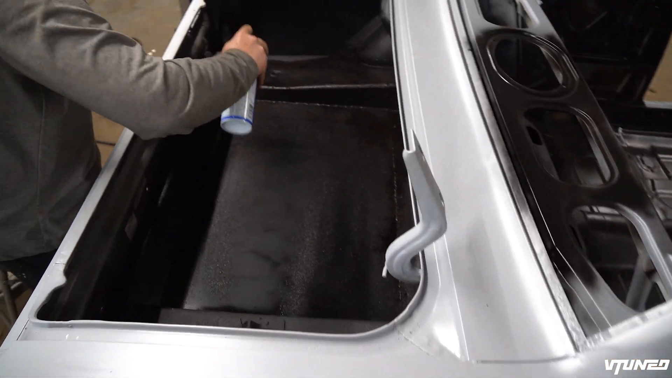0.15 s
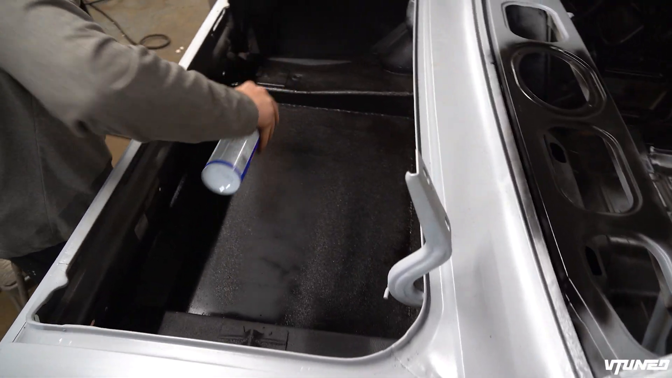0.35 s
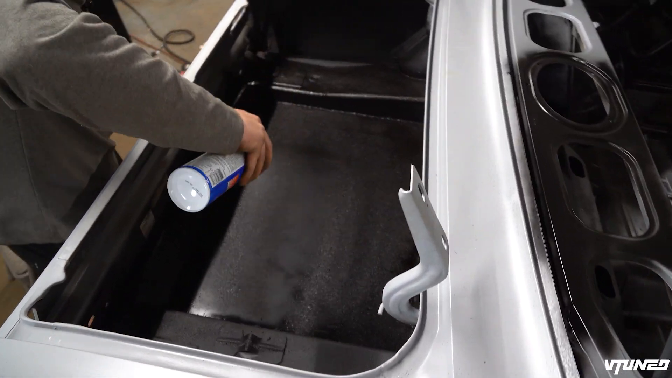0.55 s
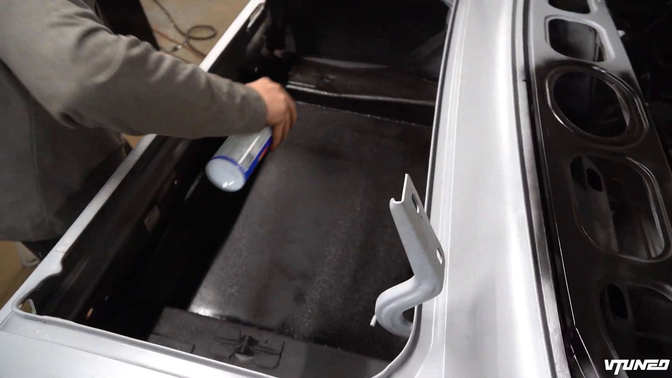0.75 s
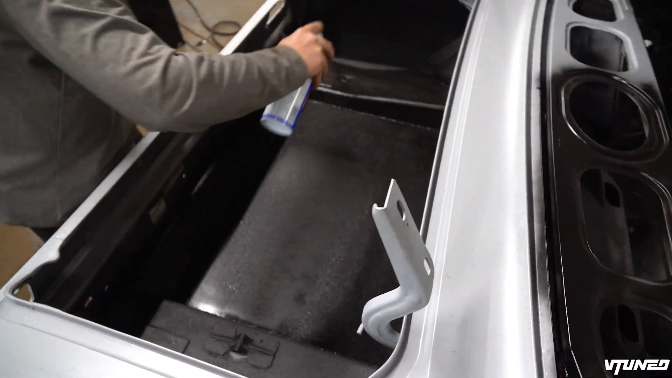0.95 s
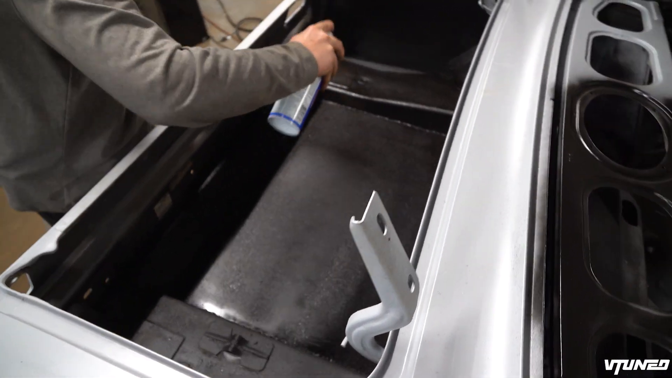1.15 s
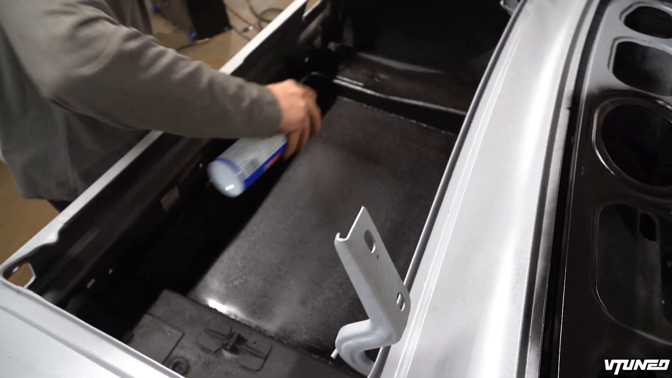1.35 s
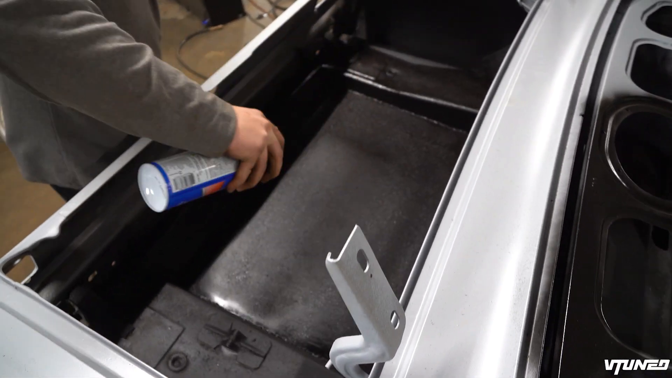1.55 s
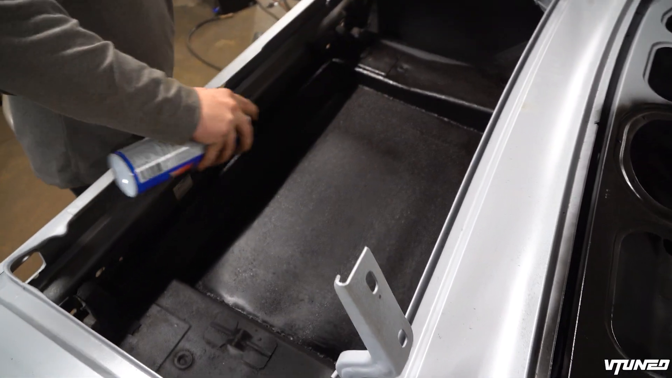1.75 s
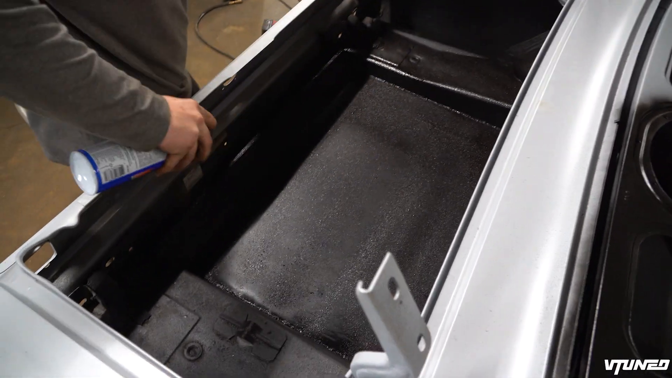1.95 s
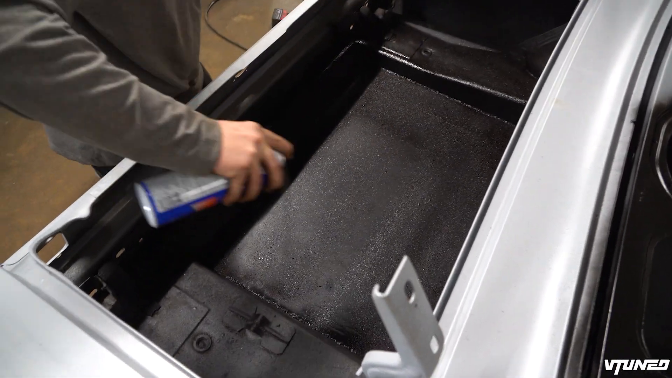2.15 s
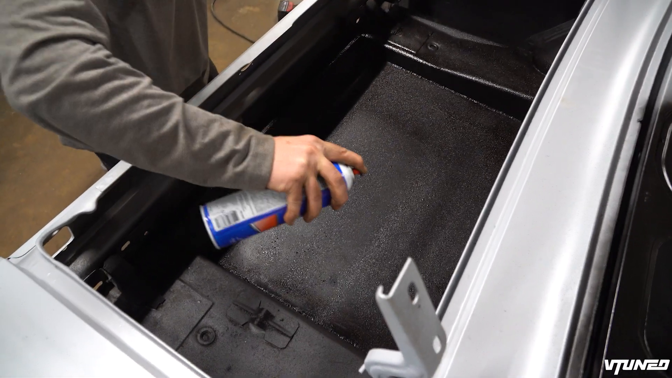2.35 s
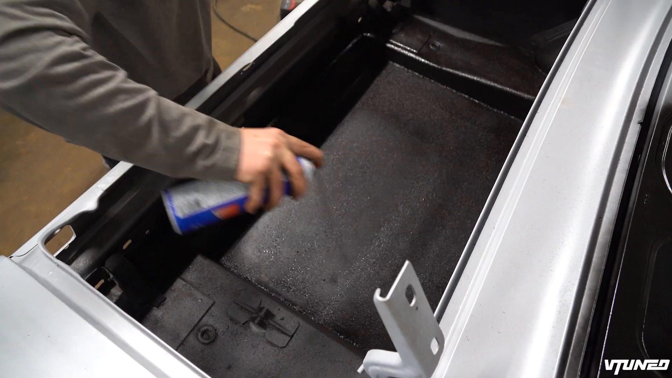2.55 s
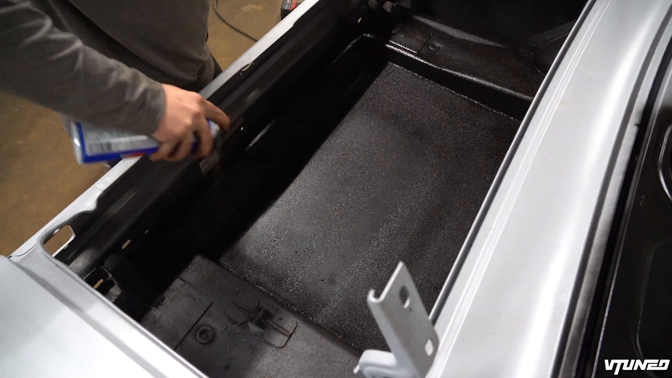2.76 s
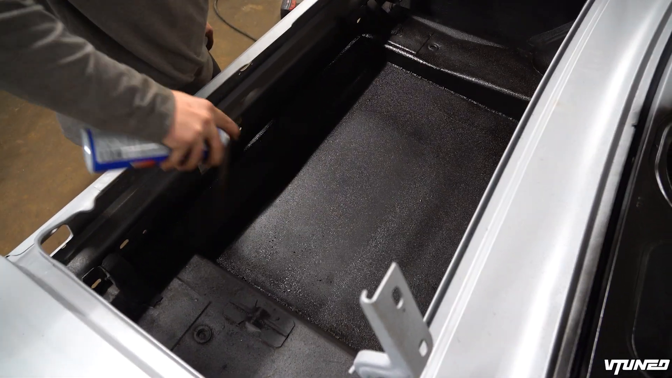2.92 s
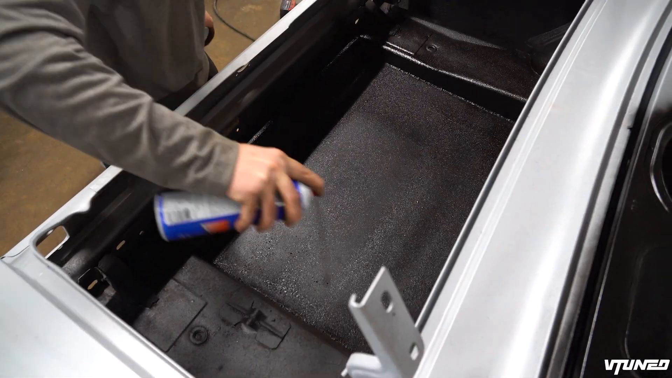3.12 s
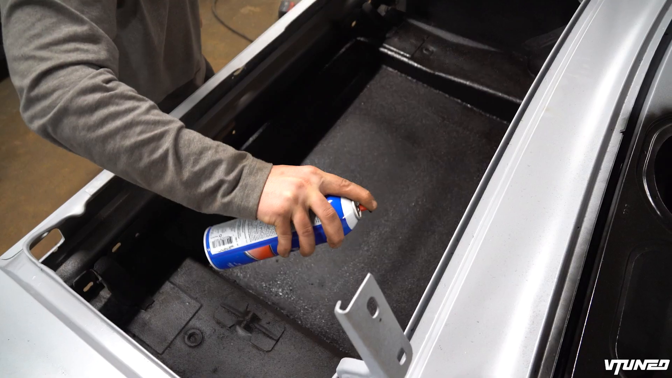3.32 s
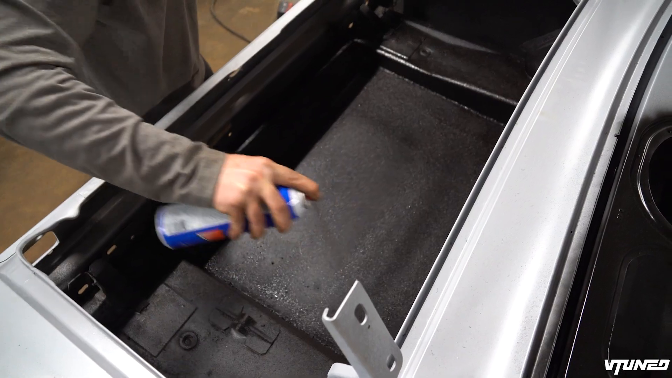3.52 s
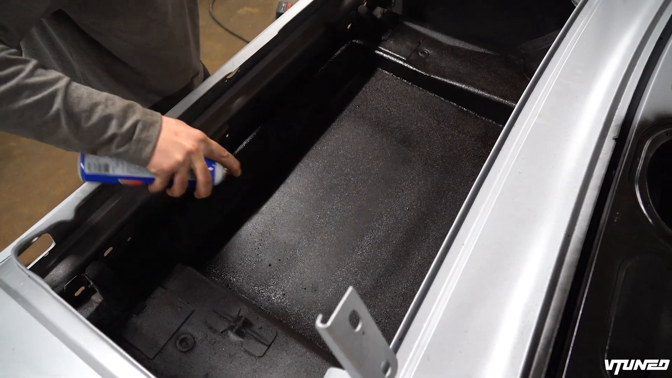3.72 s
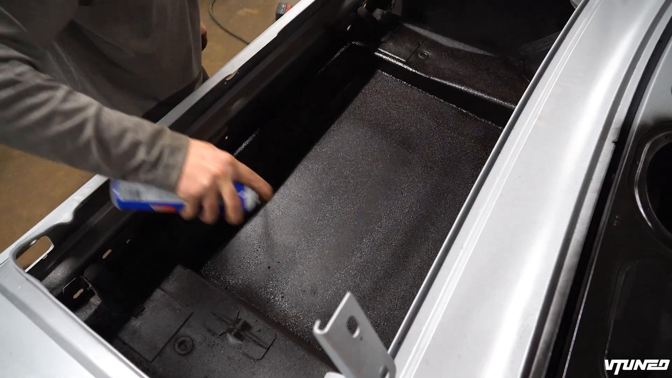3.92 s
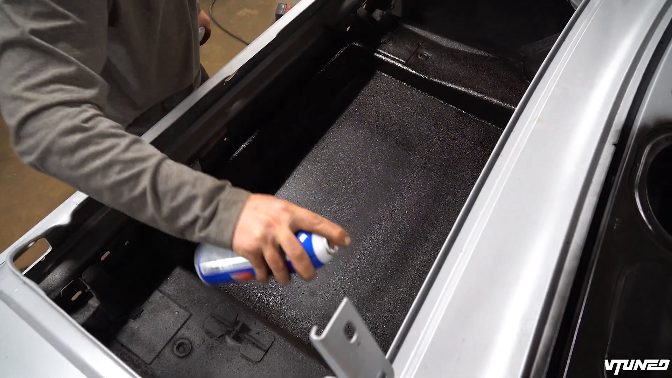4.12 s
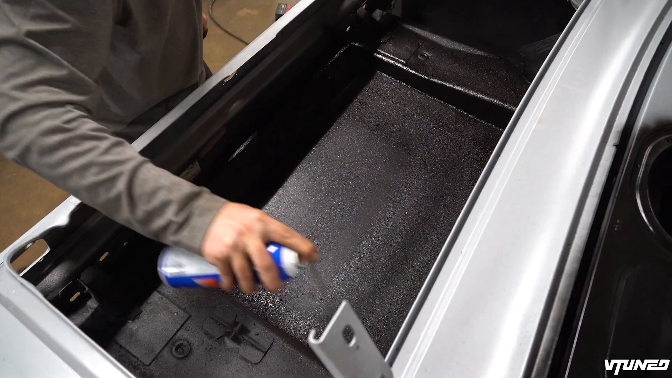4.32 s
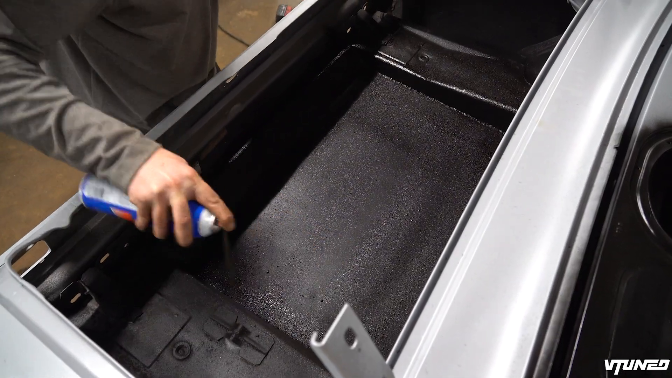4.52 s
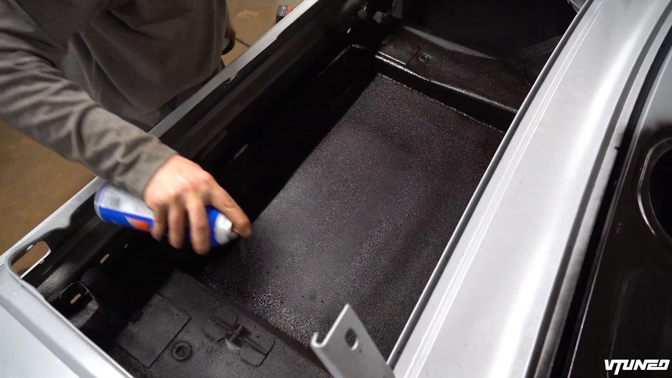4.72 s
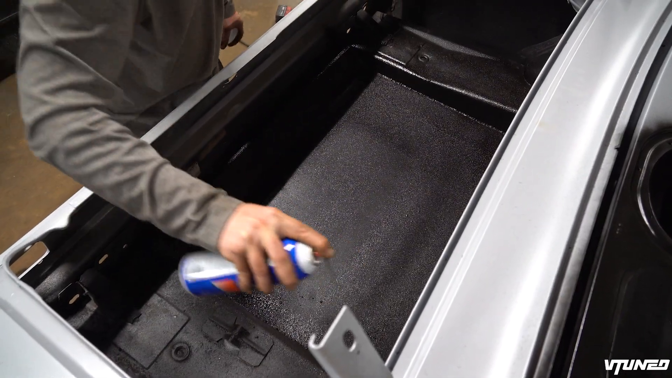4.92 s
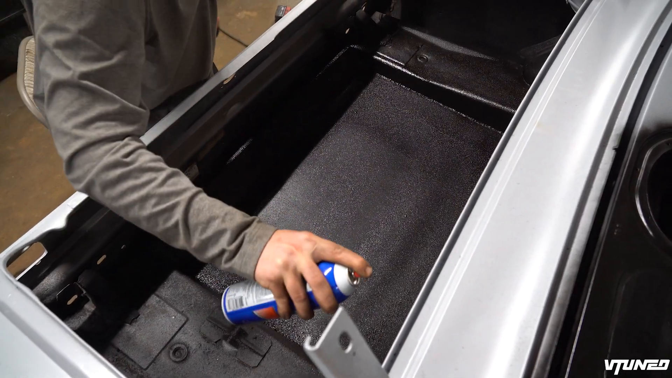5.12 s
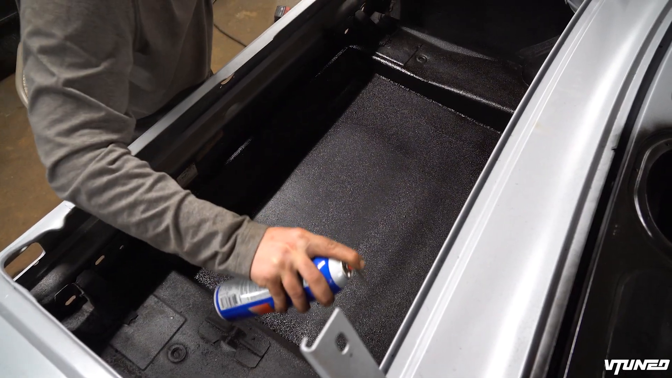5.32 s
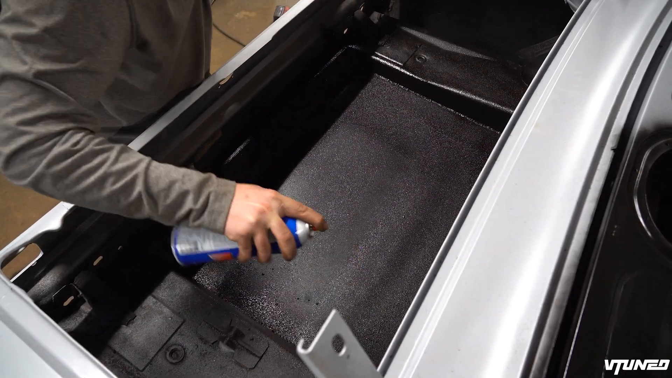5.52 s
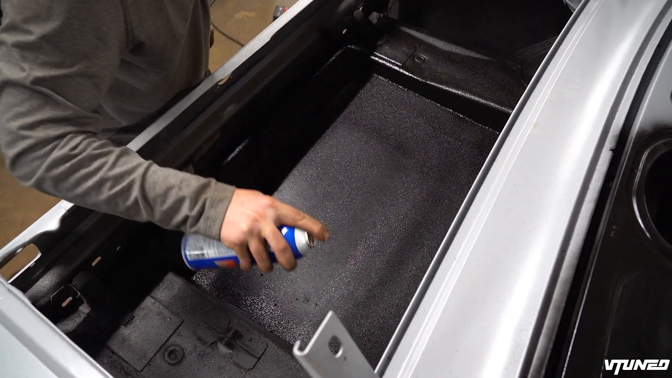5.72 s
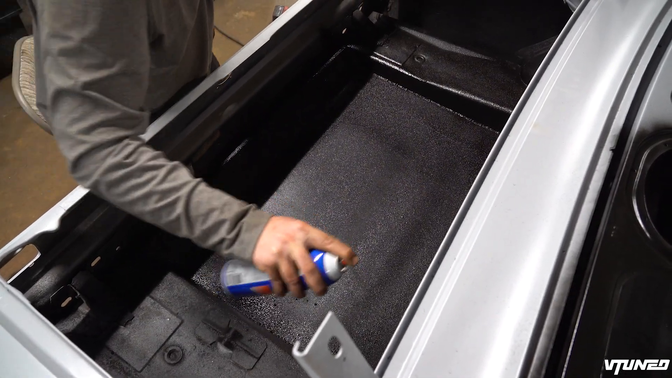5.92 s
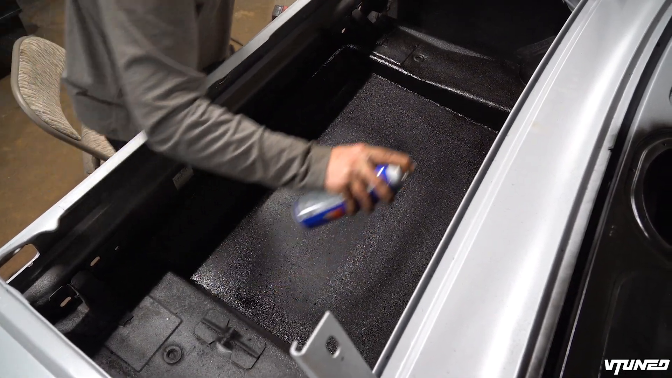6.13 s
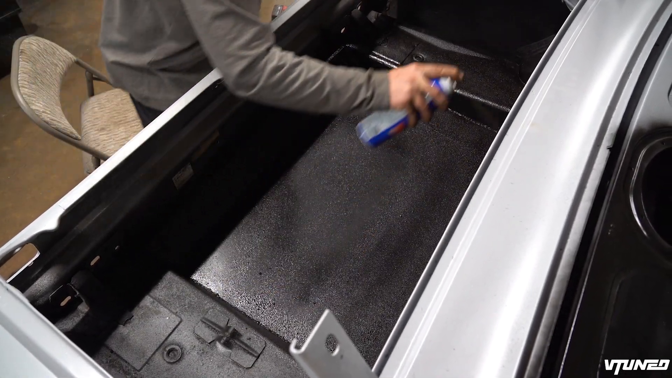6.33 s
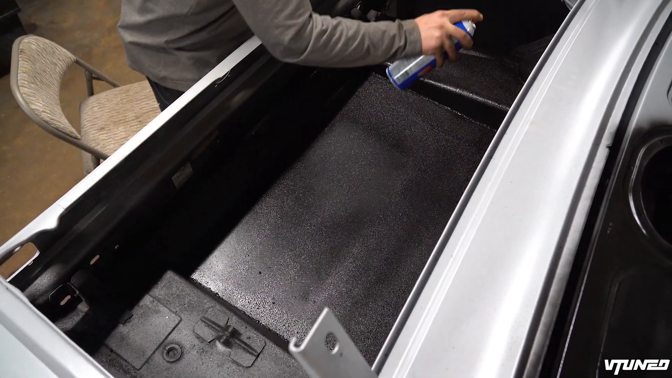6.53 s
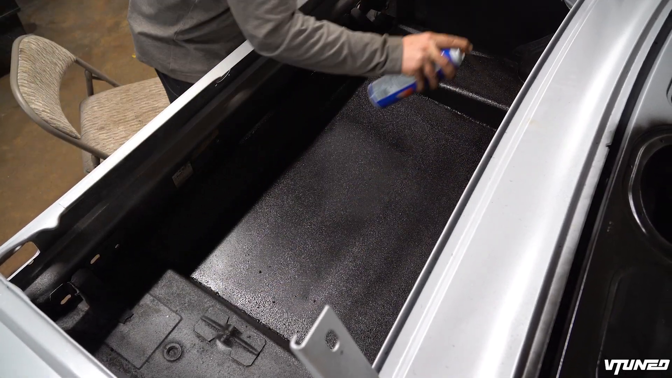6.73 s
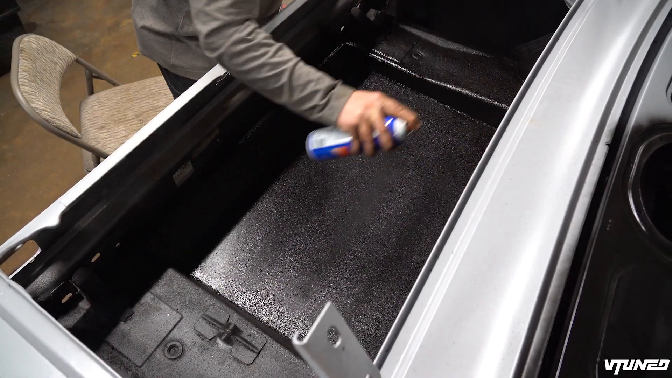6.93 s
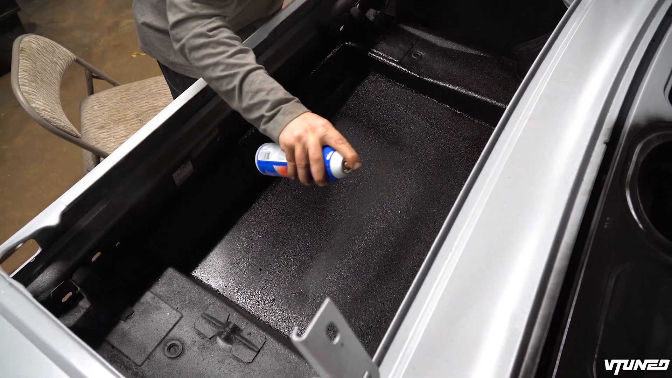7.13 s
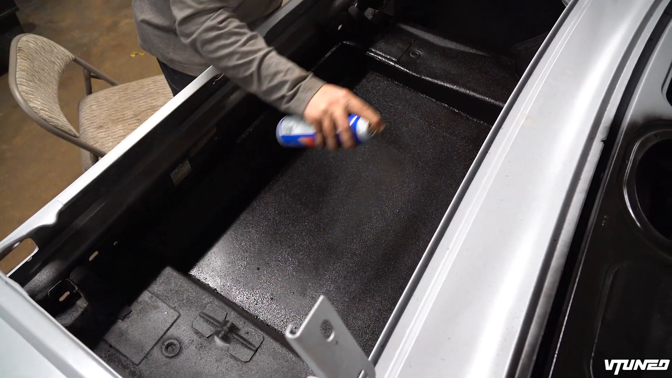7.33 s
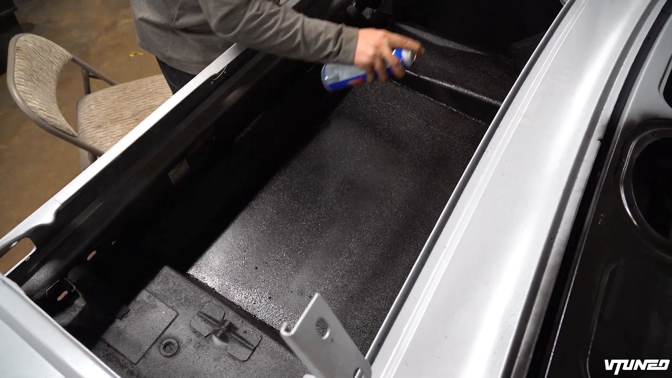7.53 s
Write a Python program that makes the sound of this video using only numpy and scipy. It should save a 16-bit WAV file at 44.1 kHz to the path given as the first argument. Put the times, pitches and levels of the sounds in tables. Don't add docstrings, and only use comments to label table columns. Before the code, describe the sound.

Spraying is already under way and cuts off at once, then steady pulsing strokes of sharp aerosol hiss follow to the end. Each opens abruptly and shuts fast, leaving a soft airy tail in the garage. Nearby metal gives the hiss a gliding, hollow, slightly phasey colour. Barely audible shoe and sleeve scuffs, low building rumble and two light metal ticks sit underneath. Close mono microphone.

```python
import sys
import numpy as np
from scipy import signal
from scipy.fft import rfft, irfft, next_fast_len
from scipy.io import wavfile
from scipy.ndimage import uniform_filter1d, map_coordinates

SR = 44100
rng = np.random.default_rng(int(sys.argv[2]) if len(sys.argv) > 2 else 0)


def master_out(mix):
    frames = np.transpose(np.atleast_2d(mix))
    ceiling = np.clip(frames, -1, 1)
    pcm = np.round(ceiling * 32767).astype(np.int16)
    wavfile.write(sys.argv[1], SR, pcm)


def convert_level_to_amplitude(level_db):
    exponent = np.asarray(level_db, float) / 20
    return 10 ** exponent


N = 333837

# (fully open [s], starts closing [s], opening time [s])
VALVE = [(-.1, 0.067, .007), (.189, 0.617, 0.0095), (0.761, 1.091, 0.012), (1.226, 1.623, 0.0094),
         (2.016, 2.439, 0.0069), (2.574, 2.885, 0.011), (3.008, 3.405, 0.01), (3.565, 3.827, 0.014),
         (3.973, 4.206, 0.011), (4.349, 4.664, 0.014), (4.866, 5.111, 0.014), (5.453, 5.637, 0.011),
         (6.028, 6.596, 0.012), (6.739, 7.187, 0.018), (7.315, 7.7, 0.017)]
# (near delay at start [ms], at end [ms], far delay at start [ms], at end [ms])
PANEL_DELAYS = [(.5, .7, 1.4, 1.8), (.74, .47, 1.6, 1.45), (.47, .72, 1.35, 1.62), (.74, .5, 1.5, 1.3),
                (.95, .8, 2.0, 1.7), (1.12, 1.0, 2.9, 3.2), (.6, .8, 1.6, 1.8), (1.8, 1.7, 2.1, 2.2),
                (1.6, 1.75, 1.8, 2.1), (1.75, 1.68, 2.7, 2.8), (1.12, 1.3, 1.65, 1.58),
                (1.9, 1.7, 2.5, 2.7), (.7, .98, 2.25, 2.65), (1.02, .82, 2.7, 2.3), (.9, .7, 1.9, 1.75)]
# (notch at start [Hz], at end [Hz], jet [dB], turn to camera at start [dB], at end [dB])
STROKES = [(4700, 4540, -30, 3, -3), (4110, 6000, -29.5, 0.3, -2), (5970, 4370, -29.5, 0.5, -0.5),
           (4180, 5850, -29.5, 0.7, 1), (7070, 5730, -30.5, 1.5, -0.5), (5410, 6480, -29.6, -2.5, -4),
           (6520, 5450, -30.5, -4, -2), (5500, 6250, -31, -1.5, -1), (6200, 5500, -30.5, -2, -1),
           (5730, 6000, -30.5, 2, 3), (5770, 5800, -30.5, 0, 4), (5300, 5860, -29, 1, 4),
           (5500, 5300, -29, -0.5, 6), (5080, 6100, -30, 5, 0), (5900, 5850, -31.5, 2.5, 6.5)]
SWELL_DB = [1.5, -0.14, 0.4, 0.29, 0.4, 0.8, -0.4, -0.19, 1.1, 0.17, 0.38, 1.5, -1.5, -1.3, 1.1]
# (frequency [Hz], density [dB])
JET_SPECTRUM = [(35, -49), (60, -22), (110, -24), (300, -23.5), (1000, -21.5), (2500, -15.5), (5000, -12.5),
                (7000, -4.5), (11000, -2), (13000, -1), (14600, -6.5), (15800, -11.5)]
# (notch [Hz], whistle [dB], presence [dB], body [dB], notch depth [dB])
UPRIGHT_COLOUR = [(3980, -12, 5, -9, 6), (4420, 0, 9.5, -4, -1.5), (4710, -1.5, 12.5, -3.5, 11),
                  (5320, -3.5, 3, 0, 13), (5800, -8.5, -17, 0, 16)]
# (notch [Hz], whistle [dB], presence [dB], body [dB], notch depth [dB])
FLAT_COLOUR = [(5170, 4, -3.5, -3.5, 3.9), (5760, 4, -0.5, 0, 6), (6120, -2.5, -9.5, 0.5, 3.8),
               (7240, -20.5, -19, 3.5, 12), (6850, -4, -6, 3.5, 8.1)]
# (notch [Hz], place along the arc [-])
ARM_ARC = [(4000, 0.21), (4700, 0.5), (5080, 0.74), (5500, 0.89), (7200, 1.2)]
# (notch [Hz], level [dB])
SHEEN = [(4050, 1.5), (4900, -1), (5600, -0.1), (6300, 1.7), (6800, 0.5), (7100, 5.5)]
# (centre [s], length [s], level [dB], frequency [Hz])
HOLLOWS = [(2.06, 0.17, 8.5, 4820), (2.145, 0.1, 8.5, 6450), (2.87, .12, 1, 4700), (6.597, 0.35, 6, 5250),
           (6.766, 0.19, 3, 5500), (6.998, 0.23, 3.5, 6740)]
# (frequency [Hz], density [dB])
GARAGE_SPECTRUM = [(90, -36), (150, -21), (750, -19), (1700, -11), (4000, -3.5), (4800, -4), (5800, -2.5),
                   (8000, 1.5), (12400, 1.5), (15800, -13)]
# (frequency [Hz], t60 [s])
GARAGE_DECAY = [(200, 0.35), (1000, 1.04), (4000, 1.2), (8000, 0.72), (12000, 0.49), (15500, 0.62)]
# (time [s], level [dB])
RUMBLE_LEVEL = [(0.0, -58.5), (1.05, -64), (1.18, -68.5), (1.64, -66), (1.67, -64), (2.02, -68.5),
                (2.07, -61.5), (2.21, -70), (2.8, -62.5), (3.22, -66), (5.99, -67.5), (6.13, -59.5),
                (7.29, -70), (7.57, -58)]
# (frequency [Hz], density [dB])
RUMBLE_SPECTRUM = [(15, -11.5), (25, 0.5), (60, -7), (72, -7.5), (82, -1.5), (94, -7.5), (170, -22.5),
                   (215, -18.5), (245, -17), (280, -24.5), (600, -26.5), (1500, -27.5), (6000, -32),
                   (12000, -53)]
# (centre [s], length [s], level [dB], frequency [Hz])
SCUFFS = [
    (.35, 0.31, -60.5, 294),
    (4.783, 0.23, -64.5, 820),
    (5.952, 0.03, -73, 800),
    (6.678, 0.22, -65, 910),
]
# (time [s], peak [dB], ring [Hz], ring t60 [s], ring level [dB])
TICKS = [
    (1.6725, -34.5, 2100, .024, -6),
    (4.7204, -30.5, 1600, .026, -11),
]
# (frequency [Hz], level [dB])
MICROPHONE = [(3000, 1.5), (4700, 4), (5500, -1), (6600, 0), (7400, 2.5), (8200, 6), (8800, 1),
              (9400, -4.5), (10200, 1), (11300, 2), (13000, -1), (14700, -4), (15740, -15), (15790, -35)]

LAID_FLAT_S = 1.8
SPURT_DB, SPURT_S = 0, 0.054
NEAR_DB, NEAR_LEAN_DB, FAR_DB, STRAY_DB = -7.5, -3.5, -12.5, -15
TURN_WHISTLE, TURN_BODY = 0.26, -0.063
AIM_FRAME, ROOM_FRAME = 512, 256


def unit(x):
    return x / np.sqrt(np.mean(x ** 2) + 1e-20)


def along(points, hz):
    f, v = np.transpose(points)
    return np.interp(np.log(hz + 1), np.log(f + 1), v)


def curves(rows, t):
    s, *cols = np.transpose(rows)
    return [np.interp(t, s, c) for c in cols]


def wobble(rate):
    knots = rng.standard_normal(int(N * rate / SR) + 4)
    return map_coordinates(knots, [np.arange(N) * rate / SR])


def coloured(x, spectrum):
    m = next_fast_len(N + 8192)
    gain = convert_level_to_amplitude(along(spectrum, np.fft.rfftfreq(m, 1 / SR)))
    return irfft(rfft(x, m) * gain, m)[:N]


def per_stroke(start, end, t):
    return np.interp(t, np.array(VALVE)[:, :2].ravel(), np.c_[start, end].ravel())


def valve(t):
    opened, shut, rise = np.transpose(VALVE)[:, :, None]
    since_shut = np.clip(t - shut, 0, None)
    closing = 700 * since_shut + 30000 * since_shut ** 2
    opening = 45 * np.clip((opened - t) / rise, 0, None) ** 1.22
    return np.max(-opening - closing, axis=0)


def turbulence():
    sputter_db = 0.62 * wobble(900) + 0.41 * wobble(120) + 0.46 * wobble(25)
    return unit(convert_level_to_amplitude(sputter_db) * rng.standard_normal(N))


def panels(x, t):
    near0, near1, far0, far1 = np.transpose(PANEL_DELAYS)
    flat = t > LAID_FLAT_S
    stray_ms = rng.uniform(1.2, 9, (len(VALVE), 6, 1)) + rng.normal(0, .3, (len(VALVE), 6, 2))
    treble = coloured(x, [(800, -19.5), (3000, 1.5)])
    top = coloured(x, [(5000, -14), (9500, 0)])
    paths = [(top, near0, near1, NEAR_DB + NEAR_LEAN_DB * flat), (treble, far0, far1, FAR_DB)]
    paths += [(treble, *stray_ms[:, k].T, STRAY_DB) for k in range(6)]
    tremor_ms = .012 * wobble(9)
    total = x
    for wave, start_ms, end_ms, db in paths:
        delay_ms = per_stroke(start_ms, end_ms, t) + tremor_ms
        position = np.clip(t - delay_ms / 1000, 0, None) * SR
        total = total + convert_level_to_amplitude(db + 1.15 * wobble(8)) * map_coordinates(wave, [position], order=3)
    return unit(total)


def aimed(x):
    hz, t, z = signal.stft(x, SR, nperseg=AIM_FRAME)
    rows = hz[:, None]
    start_hz, end_hz, _, turn0, turn1 = np.transpose(STROKES)
    arc_hz, arc_place = np.transpose(ARM_ARC)
    start_place, end_place = np.interp(start_hz, arc_hz, arc_place), np.interp(end_hz, arc_hz, arc_place)
    centre_hz = np.interp(per_stroke(start_place, end_place, t), arc_place, arc_hz)
    turn_db = per_stroke(turn0, turn1, t)
    flat = 1. * (t > LAID_FLAT_S)
    colour = (1 - flat) * curves(UPRIGHT_COLOUR, centre_hz) + flat * curves(FLAT_COLOUR, centre_hz)
    whistle, presence, body, depth_db = colour

    def share(points):
        return along(points, hz)[:, None]

    above = 1 / (1 + np.exp(np.clip((centre_hz - rows) / 150, -50, 50)))
    body_band = share([(1500, 0.035), (3200, 0.94), (4300, 0.98), (5300, 0.34), (6500, 0.24)])
    presence_band = share([(6900, 0.49), (7600, 0)])
    whistle_band = share([(6900, 0), (7600, 0.56), (8900, 0.71), (10000, 0.0056)])
    sheen_band = share([(10000, 0), (12500, 0.66), (14500, 1.7)])
    tilt = body_band * (1 - above) * (body + TURN_BODY * turn_db)
    tilt = tilt + above * presence_band * (presence + turn_db)
    tilt = tilt + whistle_band * (whistle + TURN_WHISTLE * turn_db)
    tilt = tilt + sheen_band * curves(SHEEN, centre_hz)[0]
    for s, length, db, hollow_hz in HOLLOWS:
        tilt = tilt + db * np.exp(-(2 * (t - s) / length) ** 2 - ((rows - hollow_hz) / 750) ** 2)

    depth_db = depth_db * convert_level_to_amplitude(1.5 * np.interp(t, np.arange(N) / SR, wobble(14)))
    notch = depth_db / (1 + ((rows - centre_hz) / (250 + 100 * flat)) ** 2)
    return signal.istft(z * convert_level_to_amplitude(tilt - notch), SR, nperseg=AIM_FRAME)[1][:N]


def spray():
    t = np.arange(N) / SR
    jet_db, half_swell = np.array(STROKES)[:, 2], np.divide(SWELL_DB, 2)
    opened = np.array(VALVE)[:, 0]
    latest = opened[np.searchsorted(opened - .05, t) - 1]
    spurt_db = SPURT_DB * np.exp(-np.clip(t - latest, 0, None) / SPURT_S)
    flow = convert_level_to_amplitude(per_stroke(jet_db - half_swell, jet_db + half_swell, t) + spurt_db + valve(t))
    hiss = unit(coloured(panels(turbulence(), t), JET_SPECTRUM))
    return convert_level_to_amplitude(2.0) * flow * aimed(hiss), flow


def lingering(power, t60, step):
    decay = convert_level_to_amplitude(-120 * np.arange(400) * step / t60)
    decay = decay / decay.sum(1, keepdims=True)
    early = np.pad(power, ((0, 0), (400, 0)), "edge")
    return np.abs(signal.fftconvolve(early, decay, axes=1)[:, 400:][:, :power.shape[1]])


def garage(jet, flow):
    answer = unit(coloured(rng.standard_normal(N), GARAGE_SPECTRUM))
    hz, t, z = signal.stft(answer, SR, nperseg=ROOM_FRAME)
    drive = np.interp(t, np.arange(N) / SR, flow)[None] ** 2 * np.ones((len(hz), 1))
    hall = z * convert_level_to_amplitude(-15.5) * np.sqrt(lingering(drive, along(GARAGE_DECAY, hz)[:, None], t[1]))

    jet_power = np.abs(signal.stft(jet, nperseg=ROOM_FRAME)[2]) ** 2
    near = uniform_filter1d(jet_power, size=8, axis=1, origin=3)
    scatter = unit(np.abs(signal.stft(rng.standard_normal(N), nperseg=ROOM_FRAME)[2]))
    scatter = scatter * np.exp(2j * np.pi * rng.random(z.shape))
    body = scatter * convert_level_to_amplitude(-10.5) * np.sqrt(lingering(near, np.array([[.11]]), t[1]))
    return signal.istft(hall + body, SR, nperseg=ROOM_FRAME)[1][:N]


def rumble():
    level_db, = curves(RUMBLE_LEVEL, np.arange(N) / SR)
    noise = unit(coloured(rng.standard_normal(N), RUMBLE_SPECTRUM))
    return convert_level_to_amplitude(level_db + 0.46 * wobble(5.53)) * noise


def scuffs():
    out, t = np.zeros(N), np.arange(N) / SR
    for s, length, db, hz in SCUFFS:
        band = [(hz / 5, -25), (hz * 0.65, 0), (hz * 1.9, 0), (hz * 5, -25)]
        rustle = unit(coloured(rng.standard_normal(N), band))
        out += convert_level_to_amplitude(db + 2.5 * wobble(40)) * np.exp(-(2 * (t - s) / length) ** 2) * rustle
    return out


def ticks():
    out, t = np.zeros(N + SR), np.arange(SR // 10) / SR
    crack_band = signal.butter(3, [1300, 4500], "band", fs=SR)
    for s, db, hz, t60, ring_db in TICKS:
        upper_mode = .8 * convert_level_to_amplitude(-60 * t / .06) * np.sin(2 * np.pi * 3550 * t)
        ring = (np.sin(2 * np.pi * hz * t) + upper_mode) * convert_level_to_amplitude(-60 * t / t60)
        burst = (t == 0) + .06 * convert_level_to_amplitude(-60 * t / .03) * rng.standard_normal(len(t))
        crack = signal.lfilter(*crack_band, burst)
        crack = crack / np.abs(crack).max()
        out[round(s * SR):][:len(t)] += convert_level_to_amplitude(db) * (convert_level_to_amplitude(ring_db) * ring + convert_level_to_amplitude(-4) * crack)
    return out[:N]


def scene():
    jet, flow = spray()
    return np.tile(jet + garage(jet, flow) + rumble() + scuffs() + ticks(), (2, 1))


def roll_off(x):
    return signal.sosfilt(signal.butter(12, 15850, fs=SR, output="sos"), x)


def record(dry):
    heard = np.tile(coloured(dry[0], MICROPHONE), (2, 1))
    heard = heard / (1 + np.abs(heard / .24) ** 4) ** (1 / 4)
    return roll_off(heard)


dry = scene()
out = record(dry)
master_out(out)
```